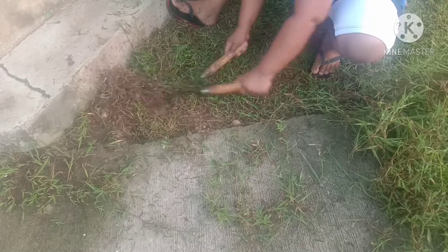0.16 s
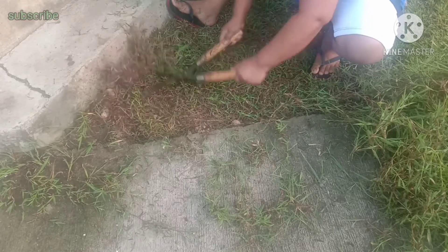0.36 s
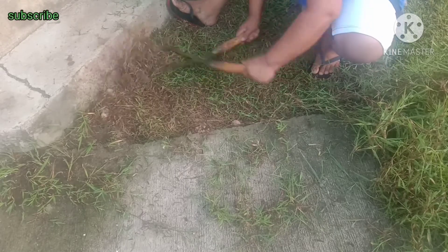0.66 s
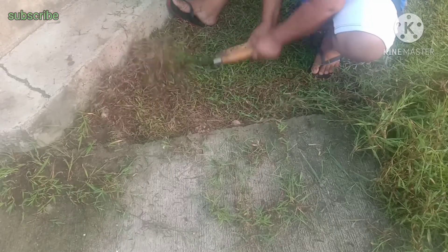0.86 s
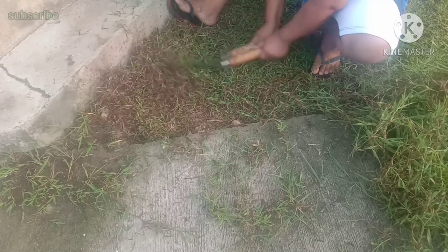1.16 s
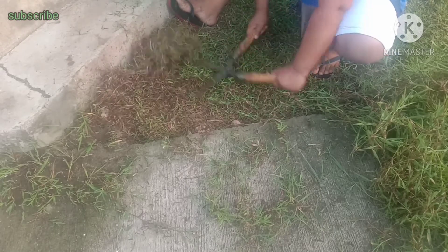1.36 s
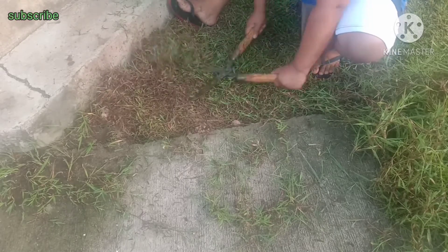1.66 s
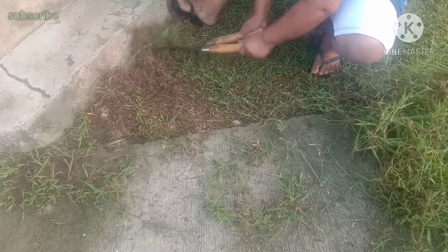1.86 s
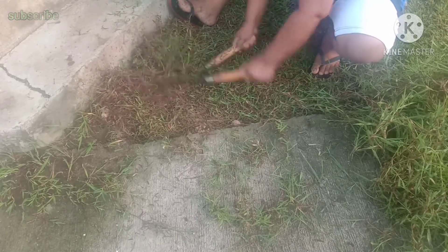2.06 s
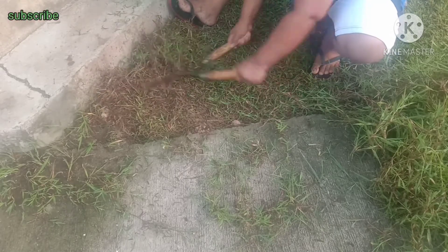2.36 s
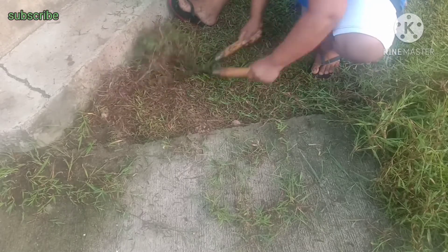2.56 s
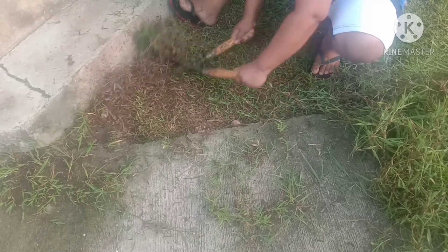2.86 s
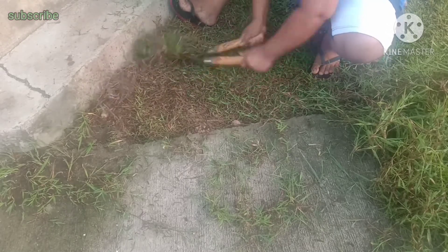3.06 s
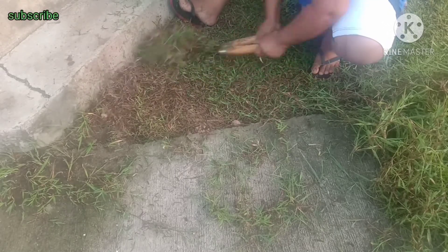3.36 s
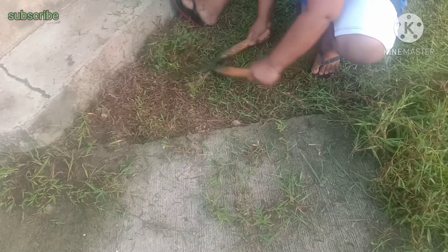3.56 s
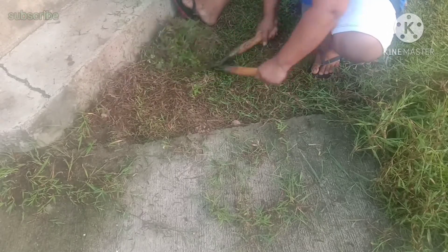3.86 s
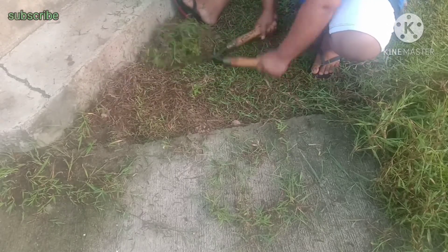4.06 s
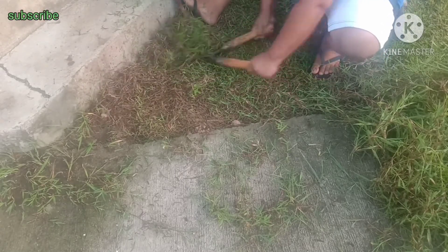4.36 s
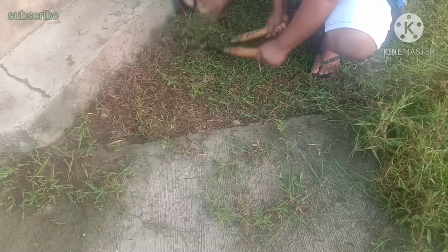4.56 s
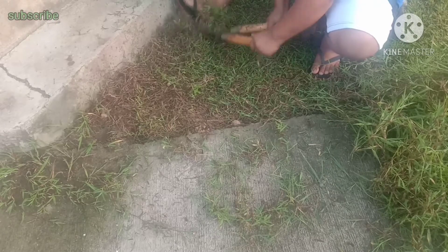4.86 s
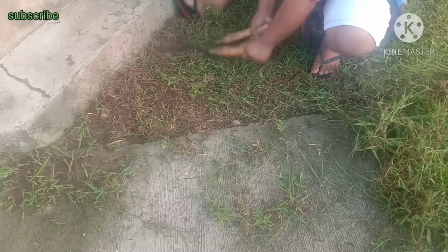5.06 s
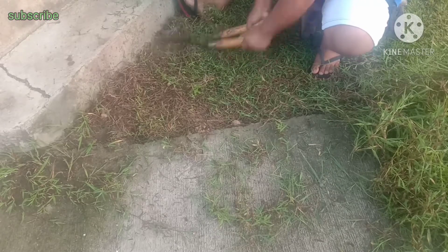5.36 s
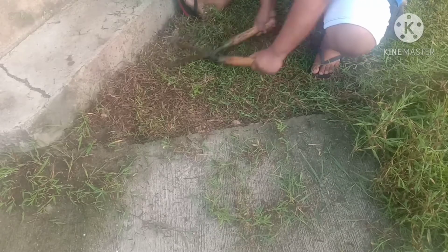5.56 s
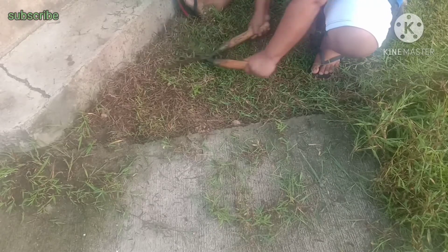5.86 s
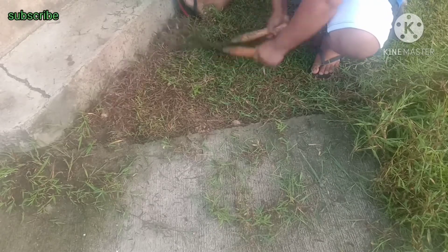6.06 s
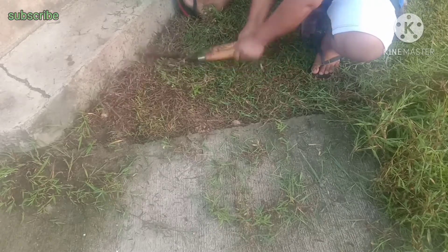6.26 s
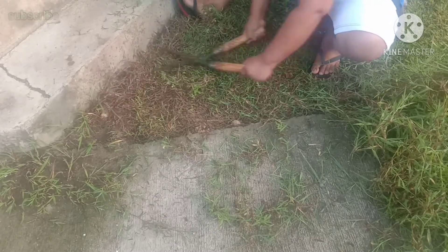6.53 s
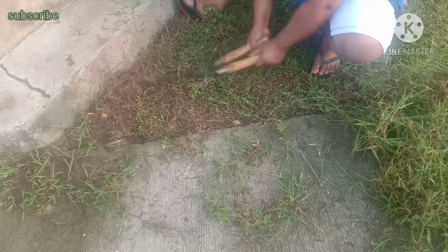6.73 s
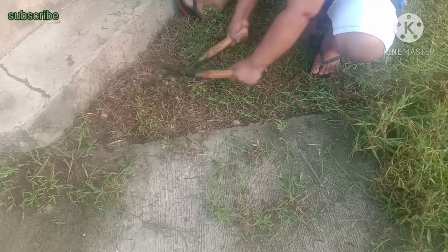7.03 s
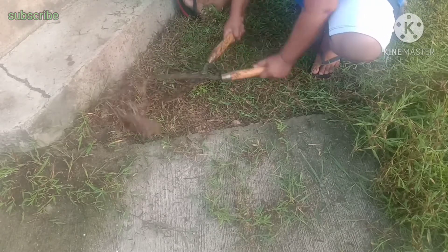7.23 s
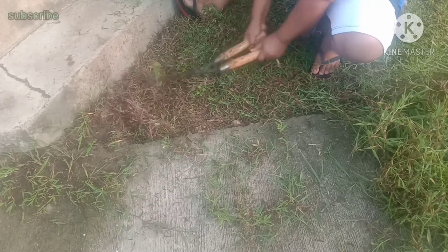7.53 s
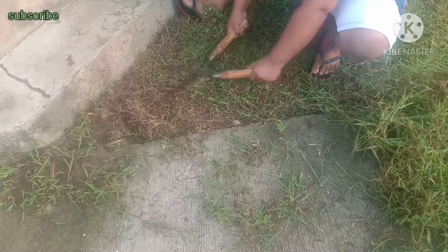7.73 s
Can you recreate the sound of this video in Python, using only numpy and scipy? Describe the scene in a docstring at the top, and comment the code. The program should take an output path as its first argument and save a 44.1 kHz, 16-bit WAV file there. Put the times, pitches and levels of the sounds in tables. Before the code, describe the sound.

Close hand shears work steadily through grass outdoors: each cut is a bright blade scrape, a hard clack and a softer scrape as they reopen. Grass rustles and crackles between. A bird gives short high chirps now and then. A distant motorbike hums, fades around two to three seconds, then returns and grows strongest at the end. Slight yard echo, slightly coloured small microphone, faint airy hiss.

```python
"""Hedge shears in a yard

Blades scrape through grass, clack shut and scrape open: friction noise and snaps drive a bright hiss, a body, a ring.
Grass rustles as gritty noise with cracks. A bird chirps in paired pitch glides; short lower peeps are sagging sines.
A motorbike drones as unsteady harmonics, fades and comes nearer, over a second engine, road noise and steady air.
Shears and birds echo off the yard; a microphone port colours everything."""
import sys
import numpy as np
from scipy import signal
from scipy.fft import rfft, irfft, next_fast_len
from scipy.io import wavfile
from scipy.ndimage import uniform_filter1d, map_coordinates

SR = 44100
rng = np.random.default_rng(int(sys.argv[2]) if len(sys.argv) > 2 else 0)


def file_out(sig):
    """Save sig as 16-bit WAV at sys.argv[1]."""
    # one column per channel
    cols = np.atleast_2d(sig).T
    # limit, then scale
    lim = np.clip(cols, -1, 1)
    pcm = np.round(lim * 32767).astype(np.int16)
    wavfile.write(sys.argv[1], SR, pcm)


N = 347949  # samples


def amp(db):
    """Amplitude factor of a level in dB."""
    return 10 ** (np.asarray(db) / 20)


def unit(x):
    """Scale to rms 1."""
    return x / np.sqrt(np.mean(x ** 2) + 1e-20)


def along(points, hz):
    """Interpolate (frequency [Hz], value) points on a log frequency axis."""
    f, v = np.transpose(points)
    return np.interp(np.log(hz + 1), np.log(f + 1), v)


def curves(rows):
    """One value per sample for each column after the time."""
    s, *cols = np.transpose(rows)
    return [np.interp(np.arange(N) / SR, s, c) for c in cols]


def wobble(rate_hz, size=N):
    """Smooth random curve with rate_hz knots a second."""
    knots = rng.standard_normal(int(size * rate_hz / SR) + 4)
    return map_coordinates(knots, [np.arange(size) * rate_hz / SR])


def add(track, s, sound):
    """Mix a sound into the track from time s on."""
    at = round(s * SR) + np.arange(len(sound))
    inside = (at >= 0) & (at < N)
    track[at[inside]] += sound[inside]


def centred_time():
    """Time axis [s] of a third of a second around an event."""
    return np.arange(SR // 3) / SR - 1 / 6


def add_bump(track, s, height, half_length_s):
    """Mix in a Gaussian bump centred on s."""
    t = centred_time()
    add(track, s + t[0], height * np.exp(-(t / half_length_s) ** 2))


def filtered(x, response):
    """x times a complex response of frequency."""
    m = 2 * next_fast_len(N // 2 + SR // 4)
    return irfft(rfft(x, m) * response(np.fft.rfftfreq(m, 1 / SR)), m)[:N]


def coloured(x, points):
    """Causal filter through (frequency [Hz], gain [dB]) points."""
    def response(hz):
        # folding the cepstrum gives minimum phase
        cepstrum = irfft(np.log(amp(along(points, hz))))
        half = len(cepstrum) // 2
        return np.exp(rfft(np.r_[cepstrum[0], 2 * cepstrum[1:half], np.zeros(half)]))
    return filtered(x, response)


def patchy(patchy_db, order):
    """White noise of rms 1 with time-frequency patches of random gain; order sets their length."""
    z = signal.stft(rng.standard_normal(N), nperseg=order)[2]
    across_hz = uniform_filter1d(rng.standard_normal(z.shape), size=5, axis=0)
    field = uniform_filter1d(across_hz, size=6, axis=1)
    return unit(signal.istft(z * amp(patchy_db * unit(field)), nperseg=order)[1][:N])


def shifting_noise(spectrum, patchy_db):
    """Slowly shifting noise of rms 1 with this spectrum."""
    return unit(coloured(patchy(patchy_db, order=1024), spectrum))


def grit(rate_hz, depth_db, patchy_db):
    """Friction noise of rms 1: tiny uneven bursts whose colour shifts with the point of contact."""
    bursts_db = depth_db * np.tanh(wobble(rate_hz) / 2) * 2.1
    return unit(patchy(patchy_db, order=384) * amp(bursts_db))


# outdoor air spectrum: (frequency [Hz], relative level [dB])
AIR_SPECTRUM = [(300, -29), (900, -27), (1450, 2.5), (1900, 2), (2300, -9), (3100, -9.5), (6000, -29.5),
                (15000, -3.5)]


def air(level_db):
    """Faint steady outdoor air: broadband noise with a fixed spectrum."""
    return amp(level_db) * shifting_noise(AIR_SPECTRUM, patchy_db=2.0)


# road noise: (time [s], exhaust rumble level [dB], tyre and air rush level [dB]), before trims
ROAD_LEVELS = [(0, -65.5, -65.5), (.6, -67, -67), (1.35, -59.5, -59.5), (1.95, -58.5, -61),
               (2.5, -66.5, -63), (3.6, -65, -65), (4.1, -64, -59), (5.1, -63.5, -59.5), (5.7, -59, -61.5),
               (6.6, -58, -59.5), (7.25, -55, -52), (7.6, -55.5, -55), (7.89, -48.5, -49)]
# exhaust rumble spectrum: (frequency [Hz], relative level [dB])
RUMBLE_SPECTRUM = [(20, -30), (45, -40), (80, 0), (125, 0.5), (160, 3.5), (250, 0), (330, -11.5),
                   (480, -17.5), (900, -38), (2500, -78)]
# tyre and air rush spectrum: (frequency [Hz], relative level [dB])
RUSH_SPECTRUM = [(100, -22.5), (400, -3), (700, -3.5), (1200, -0.5), (1700, 0), (2400, -7.5), (3300, -10.5),
                 (6000, -26), (15000, -23)]


def road(rumble_db, rush_db, lumps_db):
    """Blurred, lumpy exhaust rumble and the rush of distant tyres."""
    low_db, high_db = curves(ROAD_LEVELS)
    rumble_gain = amp(low_db + rumble_db + lumps_db * wobble(16))
    rumble = rumble_gain * shifting_noise(RUMBLE_SPECTRUM, patchy_db=2.5)
    rush = amp(high_db + rush_db) * shifting_noise(RUSH_SPECTRUM, patchy_db=4.0)
    return rumble + rush


# second, farther engine: (time [s], mean pitch [Hz], level [dB])
FAR_ENGINE_TRACK = [(0, 365, -79.5), (.7, 371, -66), (1.0, 372.4, -62.5), (1.22, 360, -67.5),
                    (1.4, 341.6, -55), (1.65, 331, -67.5), (1.9, 352, -57), (2.15, 355, -59.5),
                    (2.35, 331.6, -70), (2.8, 330, -73)]
# its scattered noise: (frequency [Hz], relative level [dB])
FAR_BLUR_SPECTRUM = [(110, -30), (160, -7), (200, 6), (255, -1.5), (350, -4.5), (430, -26), (900, -60)]


def far_engine(waver, flutter_db, blur_db):
    """A distant engine drifts in and out: one unsteady line over lumpy scattered noise."""
    mean_hz, level_db = curves(FAR_ENGINE_TRACK)
    hz = mean_hz * (1 + waver * wobble(40))
    line = amp(flutter_db * wobble(16)) * np.sin(2 * np.pi * np.cumsum(hz) / SR)
    blur = amp(blur_db) * shifting_noise(FAR_BLUR_SPECTRUM, patchy_db=6.5)
    return amp(level_db) * (line + blur)


# motorbike: (time [s], mean firing rate [Hz])
FIRING_RATE = [(0, 92), (.6, 95), (1.1, 103.5), (1.9, 98), (2.8, 83), (3.8, 85), (4.25, 89.6), (4.9, 86.7),
               (5.6, 94), (6.2, 95.3), (6.75, 98.5), (7.6, 100.7), (7.89, 103)]
# motorbike drone before trim and flutter: (time [s], level [dB])
DRONE_LEVEL = [(0, -58), (.45, -68), (.58, -75), (.78, -54.5), (1.45, -50.5), (2.0, -60), (2.25, -74.5),
               (3.0, -70), (3.8, -56.5), (4.75, -50.5), (4.9, -60), (5.35, -51.5), (5.6, -41.5), (6.3, -46),
               (6.66, -44.5), (6.75, -36), (7.1, -43.5), (7.25, -35.5), (7.89, -34)]
# octave level at the reference drone level; dB lost per dB of the drone
REFERENCE_DB, OCTAVE_DB, OCTAVE_FOLLOWS = -37, -48, 0.63


def motorbike(first_db, second_db, half_db, third_db, flutter_db):
    """Only the lowest exhaust harmonics carry; as the drone weakens they flutter and sink."""
    (hz,), (drone_db,) = curves(FIRING_RATE), curves(DRONE_LEVEL)
    octave_db = OCTAVE_DB + OCTAVE_FOLLOWS * (drone_db - REFERENCE_DB)
    far = np.clip((-41 - drone_db) / 14, .1, 1.3)
    phase = 2 * np.pi * np.cumsum(hz * (1 + 0.0387 * far * wobble(25))) / SR
    orders = ((.5, drone_db + half_db + 4 * wobble(11)),
              (1, drone_db + first_db + far * (flutter_db * wobble(18) - 3.5)),
              (2, octave_db + second_db + flutter_db * (0.13 + far / 2) * wobble(22)),
              (3, octave_db + third_db + flutter_db * wobble(12)))
    return np.sqrt(2) * sum(amp(db) * np.sin(order * phase) for order, db in orders)


DIP_DB, DIP_AFTER_S, DIP_HALF_LENGTH_S = -4.5, 0.012, 0.031


def dips():
    """Gain that briefly lowers the drone around each snip, a simplification."""
    db = np.zeros(N)
    for s, *_ in SNIP_EVENTS:
        add_bump(db, s + DIP_AFTER_S, DIP_DB, DIP_HALF_LENGTH_S)
    return amp(db)


# chirps: (time [s], level before trims [dB], pitch scale of the glides [Hz], length [s])
CHIRP_EVENTS = [(.156, -37, 7900, 0.066), (0.724, -38.5, 7540, 0.075), (2.010, -38.5, 7640, 0.067),
                (2.968, -40, 7940, 0.06), (3.784, -39.5, 8140, 0.068), (4.779, -40, 7180, 0.079),
                (5.83, -58, 7100, .075)]


def bird(level_db, second_db, waver):
    """Both sides of the syrinx flick upward, then slide down, one a little above the other."""
    out = np.zeros(N)
    for s, db, scale_hz, length_s in CHIRP_EVENTS:
        u = np.linspace(0, 1, int(length_s * SR))
        swell = np.interp(u, [0, .22, .6, .88, 1], [0.19, 0.86, 0.5, 0.61, 0.43])
        lower = np.interp(u, [0, .13, .24, .55, 1], [.63, .74, 0.93, .77, .63])
        upper = np.interp(u, [0, .22, .55, 1], [.9, 0.98, .87, .7])
        for glide, voice_db in ((lower, 0), (upper, second_db)):
            hz = scale_hz * glide * (1 + waver * wobble(494, len(u)))
            tone = np.sin(2 * np.pi * np.cumsum(hz) / SR)
            add(out, s, amp(db + level_db + voice_db) * swell * tone)
    return out


# short lower peeps: (time [s], level before trim [dB], starting pitch [Hz], length [s])
PEEP_EVENTS = [(6.999, -45, 1600, 0.045), (7.213, -32.5, 1740, 0.025), (7.329, -45, 1607, 0.026)]


def peeps(level_db, sag):
    """Brief whistled notes that sag in pitch with a small random waver."""
    out = np.zeros(N)
    for s, db, start_hz, length_s in PEEP_EVENTS:
        u = np.linspace(0, 1, int(length_s * SR))
        hz = start_hz * (1 - sag * u + 0.016 * wobble(300, len(u)))
        tone = np.sin(2 * np.pi * np.cumsum(hz) / SR)
        add(out, s, amp(db + level_db) * np.sin(np.pi * u) * tone)
    return out


# dragged grass before trim: (time [s], level [dB])
RUSTLE_LEVEL = [(0, -61), (.7, -61.5), (1.4, -61), (1.65, -72), (1.95, -61.5), (2.4, -70.5), (2.9, -59),
                (3.25, -57.5), (3.9, -56.5), (4.25, -55), (4.4, -59), (4.7, -57), (5.0, -62), (5.25, -60),
                (6.1, -63), (6.9, -64), (7.89, -69.5)]
# blades sweep into a new tuft: (time [s], level before trim [dB])
SWISH_EVENTS = [(0.471, -53), (1.04, -62), (1.86, -57), (4.91, -63), (6.13, -61), (6.57, -59)]
# grass spectrum: (frequency [Hz], gain [dB])
GRASS_SPECTRUM = [(300, -9.5), (1000, -1.5), (3200, 0.5), (5500, 4), (9000, 2), (15000, -4)]
SWISH_HALF_LENGTH_S = 0.016
TOSS_DB, TOSS_AFTER_S, TOSS_HALF_LENGTH_S = -61, 0.039, 0.023  # clippings fly; level before trim
CRACKS_PER_S = 70


def grass(level_db, crackle_db):
    """Stems brush past the shears, more so in a new tuft and as clippings fly; single ones crack."""
    rustle_db, = curves(RUSTLE_LEVEL)
    motion = amp(rustle_db)
    for s, *_ in SNIP_EVENTS:
        add_bump(motion, s + TOSS_AFTER_S, amp(TOSS_DB), TOSS_HALF_LENGTH_S)
    for s, db in SWISH_EVENTS:
        add_bump(motion, s, amp(db), SWISH_HALF_LENGTH_S)
    brushing = grit(rate_hz=190, depth_db=2.5, patchy_db=4.0) * amp(2.5 * wobble(40))
    cracks = (rng.random(N) < CRACKS_PER_S / SR) * rng.standard_normal(N)
    stems = coloured(brushing + amp(crackle_db) * unit(cracks), GRASS_SPECTRUM)
    return amp(level_db) * motion * unit(stems)


# short low knocks and resonant scrapes, some brief, some drawn out:
# (time [s], level before trim [dB], resonance [Hz], length [s])
KNOCK_EVENTS = [(.01, -50.5, 1070, 0.13), (.02, -48, 3400, 0.041), (0.864, -63, 3760, .025),
                (1.251, -49, 3640, 0.046), (1.34, -53, 3940, 0.094), (1.489, -41, 1190, 0.02),
                (1.898, -50, 1450, 0.22), (3.795, -51.5, 625, 0.069), (3.924, -52.5, 670, .2),
                (3.9, -54, 3300, 0.57), (4.462, -35, 1170, 0.013), (4.825, -43.5, 1127, 0.075),
                (5.185, -44, 1100, 0.062), (5.566, -46.5, 1050, 0.076), (7.209, -46, 920, 0.049),
                (7.33, -43.5, 1220, .06)]
# rasp of the pivot: median resonance, its log scatter, level over the reopening scrape, length
PIVOT_HZ, PIVOT_SPREAD, PIVOT_DB, PIVOT_S = 2730, 0.14, -14, 0.05


def knocks(level_db, sharpness):
    """Each knock or scrape, and the pivot at each reopening, is a noise burst through one resonance."""
    out = np.zeros(N)
    pivot = []
    for s, _, _, pause_s, open_db in SNIP_EVENTS:
        hz = PIVOT_HZ * np.exp(PIVOT_SPREAD * rng.standard_normal())
        pivot.append((s + pause_s - OPENING[1] / 2, open_db + PIVOT_DB, hz, PIVOT_S))
    for s, db, hz, length_s in [*KNOCK_EVENTS, *pivot]:
        u = np.linspace(0, 1, int(length_s * SR))
        b, a = signal.iirpeak(hz, sharpness, fs=SR)
        once = signal.lfilter(b, a, rng.standard_normal(len(u)))
        burst = signal.lfilter(b, a, once)
        add(out, s, amp(db + level_db) * np.sin(np.pi * u ** 0.63) * unit(burst))
    return out


# bright part of the steel: (frequency [Hz], gain [dB])
EDGE_RESPONSE = [(500, -19.5), (1800, -13.5), (3200, -2.5), (5500, 0.5), (9000, 1), (15000, 1)]
# blades and handles: (frequency [Hz], gain [dB])
BODY_RESPONSE = [(150, -43), (500, -18), (1000, -10), (1700, -1), (2500, 1), (3600, -5), (7000, -27),
                 (15000, -46)]
# ring of the blades: (frequency [Hz], relative level [dB], t60 [s])
BLADE_MODES = [(2280, 4, 0.089), (2620, 2.5, 0.062), (4030, -7, 0.046), (5028, -9, 0.066),
               (6900, -12, 0.071), (8150, 10, 0.075), (10500, 2, 0.12)]


def steel(edge_force, body_force, ring_db):
    """The shears answer with a bright hiss, a woody body and a faint ring."""
    t = np.arange(SR // 5) / SR
    ring = sum(amp(db - 60 * t / t60_s) * np.sin(2 * np.pi * hz * t) for hz, db, t60_s in BLADE_MODES)
    ringing = amp(ring_db) * signal.fftconvolve(edge_force, ring)[:N]
    return coloured(edge_force, EDGE_RESPONSE) + coloured(body_force, BODY_RESPONSE) + ringing


# snips: (time the blades shut [s], closing scrape level [dB], clack level [dB],
#         pause until they reopen [s], reopening scrape level [dB]); levels before trims
SNIP_EVENTS = [(0.2359, -32, -29.5, 0.096, -36), (0.5173, -31.5, -32.5, 0.096, -37.5),
               (.882, -39.5, -43, 0.082, -46.5), (1.1918, -35, -35.5, 0.08, -43.5),
               (1.4938, -37.5, -34.5, 0.09, -43.5), (1.827, -38, -48, 0.064, -45.5),
               (2.128, -33, -32.5, 0.083, -46.5), (2.44, -32, -33.5, 0.081, -41),
               (2.7118, -35.5, -30, .085, -36), (3.0029, -32.5, -28, 0.081, -39.5),
               (3.3044, -36, -28.5, 0.089, -43.5), (3.644, -29, -30, 0.084, -37.5),
               (3.949, -37.5, -55, .09, -58), (4.2199, -34, -28, 0.079, -43.5),
               (4.4926, -40, -30, 0.075, -45.5), (4.7547, -30.5, -29.5, 0.089, -36.5),
               (5.12, -38, -30, .1, -39), (5.3949, -31, -26.5, 0.094, -38), (5.684, -42, -29.5, 0.089, -40),
               (5.978, -36, -39, 0.073, -45.5), (6.2853, -33.5, -27.5, 0.12, -40.5),
               (6.6826, -47, -30, .1, -56), (7.1187, -35.5, -30.5, 0.097, -40),
               (7.5127, -32.5, -31.5, 0.077, -37.5), (7.844, -30.5, -29.5, .085, -43.5)]
# extra clicks and ticks of the shears, each with a scrape after it, often very faint:
# (time [s], click level [dB], scrape level [dB]); levels before trims
TICK_EVENTS = [(0.0223, -38.5, -42), (1.1093, -46, -60), (1.7483, -47.5, -58), (2.073, -43.5, -58),
               (2.7019, -34, -37), (3.2784, -35.5, -34.5), (3.5867, -45, -54), (4.4655, -27.5, -44),
               (5.654, -58, -43.5), (5.77, -38.5, -50), (5.9546, -30, -60), (6.6341, -26.5, -39.5),
               (6.6688, -32, -57), (6.814, -42.5, -50), (7.0931, -33, -41), (7.2128, -36, -48),
               (7.445, -49, -66)]
# scrape shapes: (relative body level [dB], rise over the last 20 dB [s], fall over the first 20 dB [s])
CLOSING, OPENING, AFTER_TICK = (-4, 0.021, 0.022), (-6.5, 0.021, 0.04), (-4, 0.0017, 0.052)
# the closing rise holds at the brisk level and doubles for each SLOWER_DB below it
BRISK_DB, SLOWER_DB = -30.5, 8.5


def scrapes():
    """Every blade slide (s, dB, body dB, rise s, fall s): weak snips close more slowly; each reopens."""
    body_db, rise_s, fall_s = CLOSING
    for s, db, _, pause_s, open_db in SNIP_EVENTS:
        yield s, db, body_db, rise_s * 2 ** ((BRISK_DB - db) / SLOWER_DB), fall_s
        yield (s + pause_s, open_db, *OPENING)
    for s, _, db in TICK_EVENTS:
        yield (s + AFTER_TICK[1], db, *AFTER_TICK)


def strokes(edge_db, body_db, curve):
    """Friction swells and dies with the speed of the blades; snapping stems roughen it."""
    t, edge, body = centred_time(), np.zeros(N), np.zeros(N)
    for s, db, low_db, rise_s, fall_s in scrapes():
        swell = amp(db - 20 * np.maximum(-t / rise_s, t / fall_s) ** curve)
        add(edge, s + t[0], swell)
        add(body, s + t[0], swell * amp(low_db))
    stems = grit(rate_hz=500, depth_db=1.5, patchy_db=4.0)
    handles = grit(rate_hz=250, depth_db=1, patchy_db=5.5)
    return steel(amp(edge_db) * edge * stems, amp(body_db) * body * handles, ring_db=-54)


# stems snap before the stop: longest lead, loudest level over the scrape, range below it
STEMS_PER_SNIP, STEM_LEAD_S, STEM_DB, STEM_SPREAD_DB = 3, .02, -5, 13.5
REBOUND_S, REBOUND_DB = 0.0047, -10  # mean delay, level over the clack


def contacts():
    """Every click (s, dB): stems snap, the blades hit their stop and rebound once; then extra ticks."""
    for s, scrape_db, db, _, _ in SNIP_EVENTS:
        for early, thin in rng.random((STEMS_PER_SNIP, 2)):
            yield s - STEM_LEAD_S * early, scrape_db + STEM_DB - STEM_SPREAD_DB * (thin + early) / 2
        yield s, db
        yield s + REBOUND_S * (.5 + rng.random()), db + REBOUND_DB
    for s, db, _ in TICK_EVENTS:
        yield s, db


CHATTER_T60_S = 0.0093


def clacks(edge_db, body_db, snap):
    """Each contact is one hard snap and a few milliseconds of chatter."""
    t, edge, body = np.arange(SR // 20) / SR, np.zeros(N), np.zeros(N)
    for s, db in contacts():
        force = rng.standard_normal((2, len(t))) * amp(-60 * t / CHATTER_T60_S)
        force[0, 0] = snap  # edge only
        # the level alone sets the energy of a click
        force *= amp(db) * np.sqrt(SR // 250) / np.linalg.norm(force, axis=1, keepdims=True)
        add(edge, s, force[0])
        add(body, s, force[1])
    return steel(amp(edge_db) * edge, amp(body_db) * body, ring_db=-48.5)


# yard reverberation: (frequency [Hz], t60 [s])
YARD_DECAY = [(200, 0.6), (2000, 0.18), (6000, 0.23), (14000, 0.31)]


def yard(x):
    """Walls and paving scatter a short noise tail; the bass lasts longest."""
    hz, t, z = signal.stft(rng.standard_normal(SR // 2), SR, nperseg=256)
    decay = amp(-60 * t / along(YARD_DECAY, hz)[:, None])
    tail = signal.istft(z * decay, SR, nperseg=256)[1]
    delayed = np.pad(tail, (SR // 150, 0))
    return signal.fftconvolve(x, delayed / np.linalg.norm(tail))[:N]


def scene():
    """Shears and bird echo in the yard, over rustling grass and distant traffic."""
    bike = motorbike(first_db=0.77, second_db=0, half_db=-23.5, third_db=-21, flutter_db=4.5)
    traffic = bike * dips()
    traffic += far_engine(waver=0.0257, flutter_db=3, blur_db=5)
    traffic += road(rumble_db=5.5, rush_db=2.02, lumps_db=2.5)
    birds = bird(level_db=-2.5, second_db=2.5, waver=0.0182) + peeps(level_db=0.5, sag=0.026)
    shears = strokes(edge_db=1.5, body_db=7.5, curve=0.86)
    shears += clacks(edge_db=3, body_db=-1, snap=4.4)
    shears += knocks(level_db=-5.0, sharpness=2.54)
    echoes = amp(-19) * yard(shears) + amp(-3.5) * yard(birds)
    rustling = grass(level_db=3, crackle_db=-15.5)
    return (air(level_db=-58.5) + traffic + birds + rustling + shears + echoes)[None]


# microphone colour: (frequency [Hz], gain [dB])
PORT_COLOUR = [(800, 0), (1550, 0), (2150, 2), (2750, 1.5), (3150, -2), (3800, -0.5), (4500, -2.5),
               (5400, 2), (8300, -0.5), (9450, 1.5), (9950, -6), (10800, 5), (12800, -9), (15300, -16.5)]
# resonance added to the direct path: (centre [Hz], width [Hz], level [dB])
PORT_RESONANCE = (1870, 90, 3.5)
TOP_HZ = 15750  # band limit


def record(dry):
    """The microphone port colours the sound and rings; nothing passes above the band limit."""
    centre_hz, width_hz, ring_db = PORT_RESONANCE

    def port(hz):
        damping = 1j * hz * width_hz
        ring = amp(ring_db) * damping / (centre_hz ** 2 - hz ** 2 + damping)
        return (1 + ring) * (hz < TOP_HZ)
    return filtered(coloured(dry[0], PORT_COLOUR), port)[None]


dry = scene()
out = record(dry)
file_out(out)
```